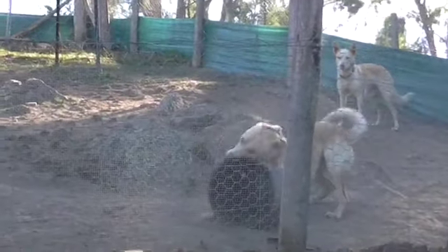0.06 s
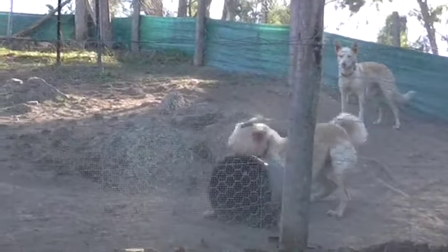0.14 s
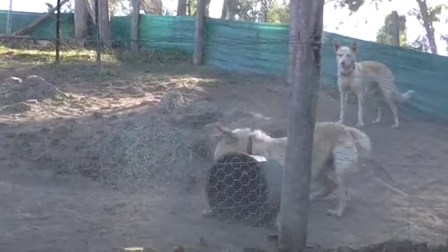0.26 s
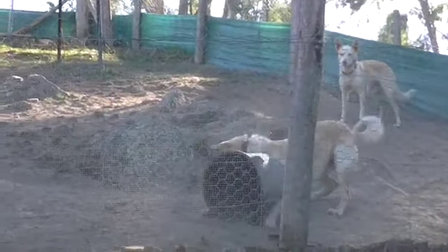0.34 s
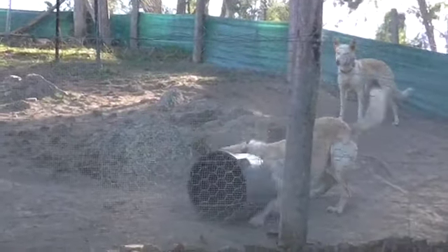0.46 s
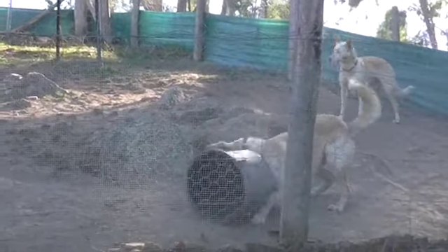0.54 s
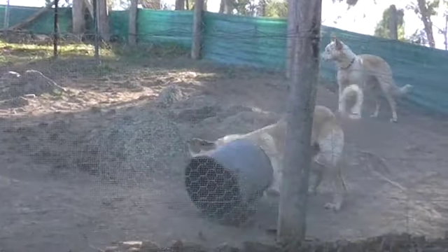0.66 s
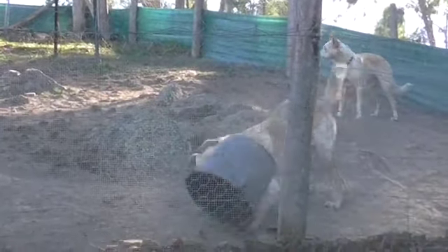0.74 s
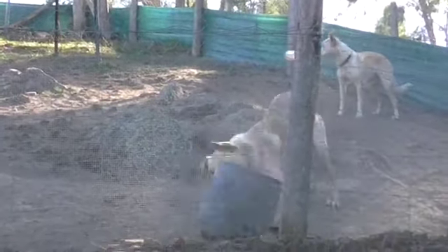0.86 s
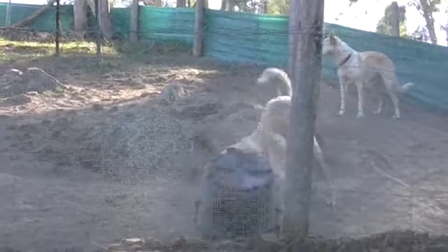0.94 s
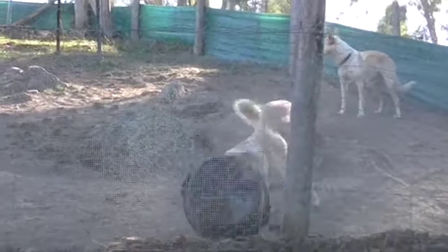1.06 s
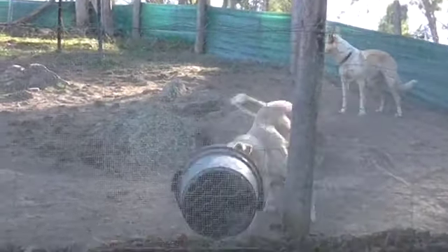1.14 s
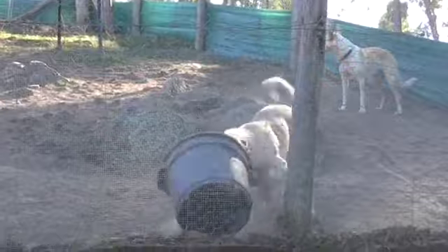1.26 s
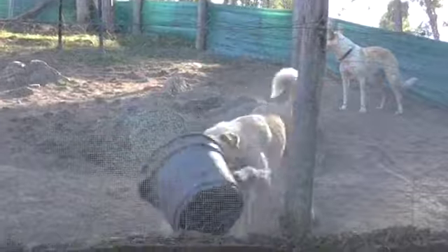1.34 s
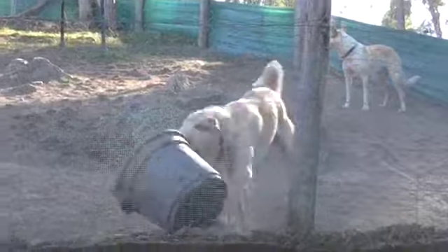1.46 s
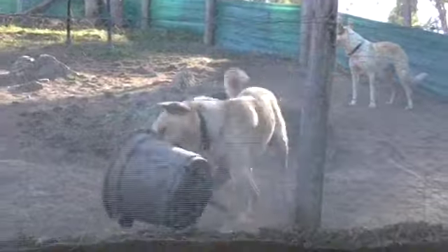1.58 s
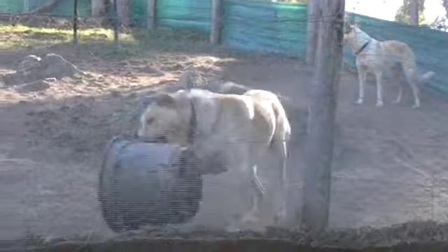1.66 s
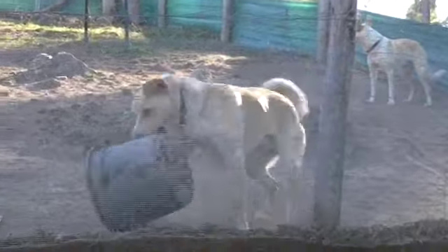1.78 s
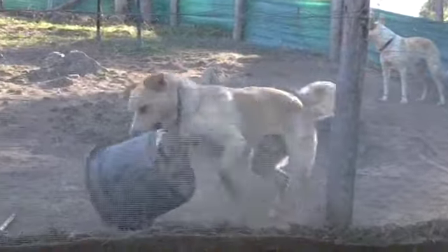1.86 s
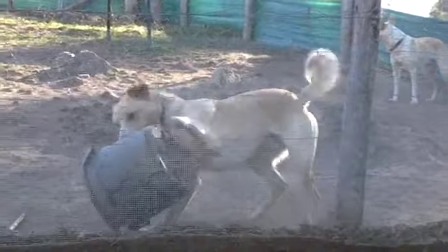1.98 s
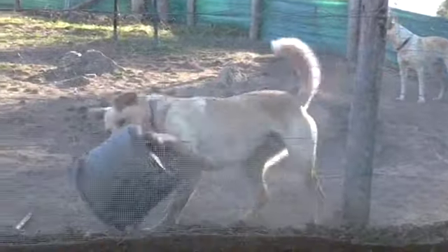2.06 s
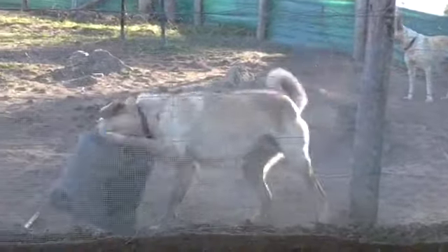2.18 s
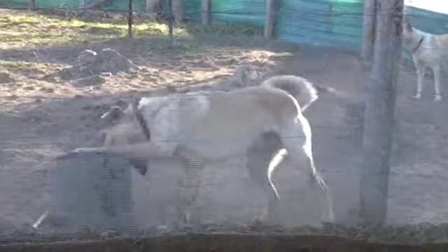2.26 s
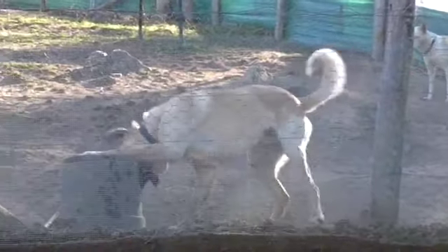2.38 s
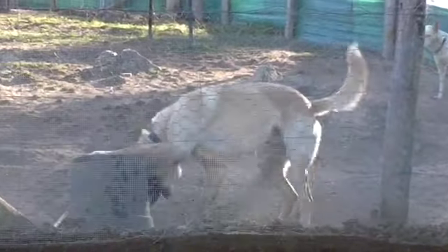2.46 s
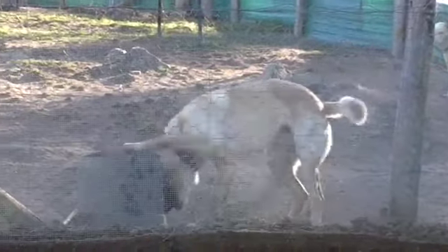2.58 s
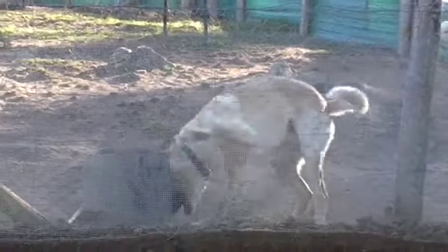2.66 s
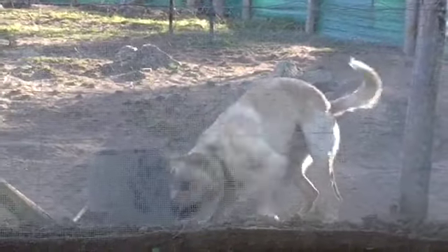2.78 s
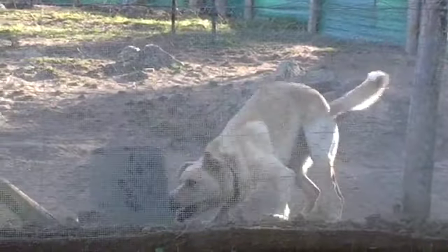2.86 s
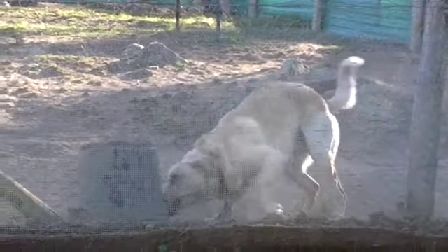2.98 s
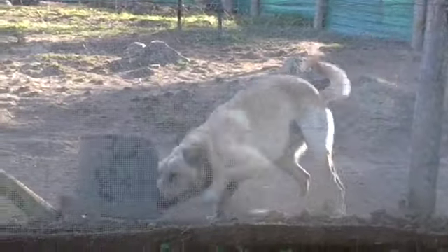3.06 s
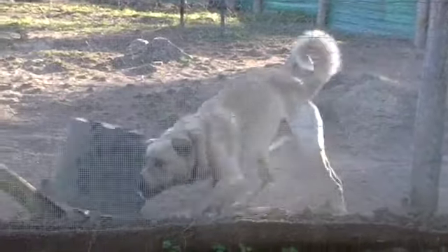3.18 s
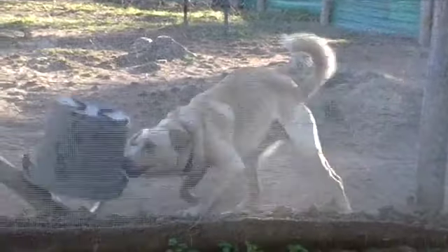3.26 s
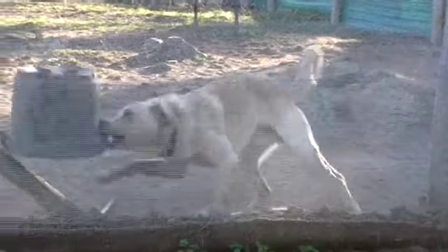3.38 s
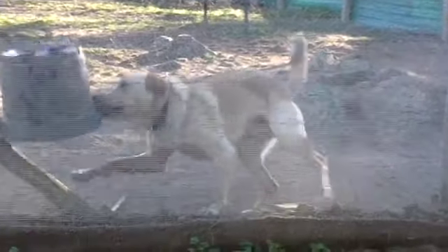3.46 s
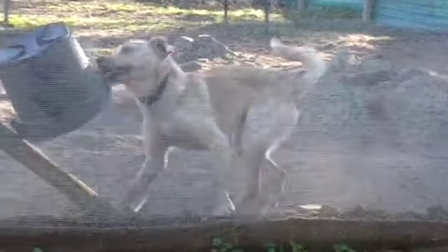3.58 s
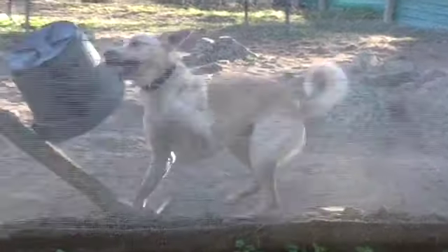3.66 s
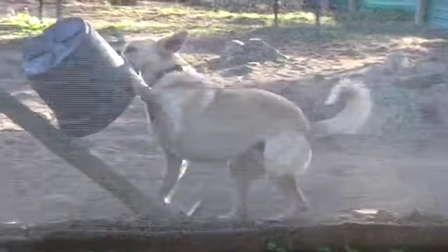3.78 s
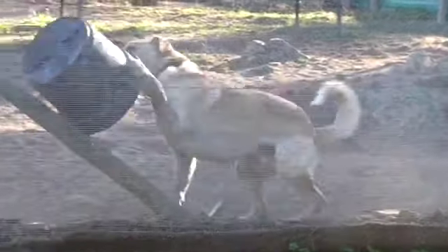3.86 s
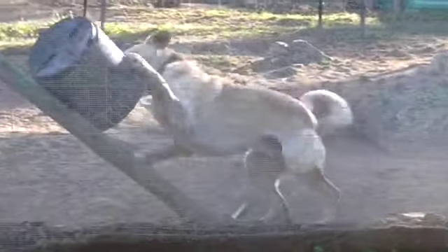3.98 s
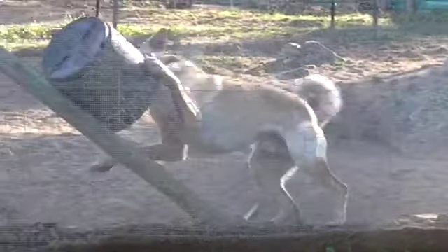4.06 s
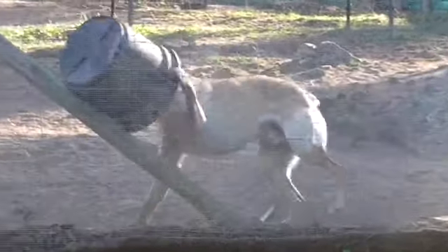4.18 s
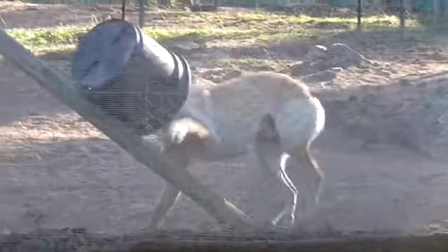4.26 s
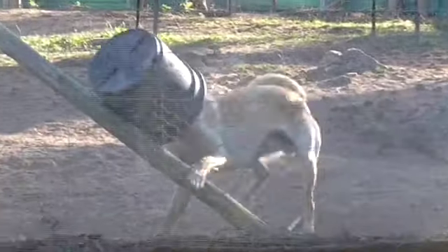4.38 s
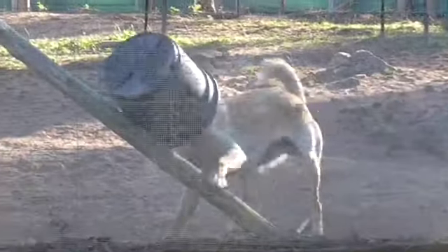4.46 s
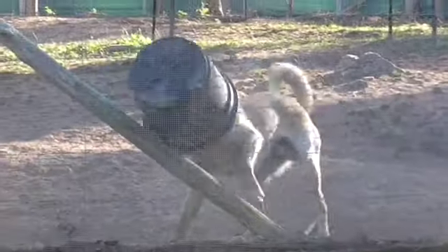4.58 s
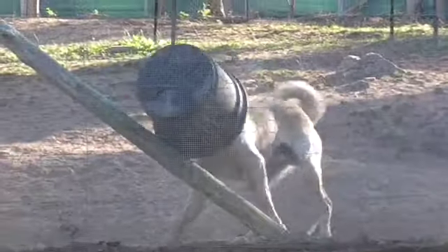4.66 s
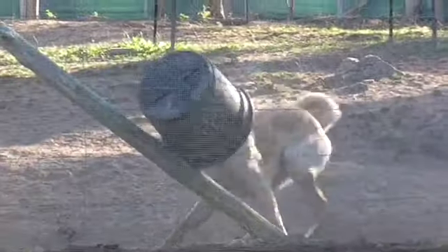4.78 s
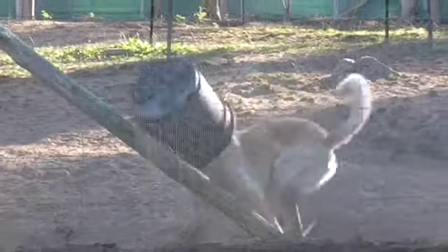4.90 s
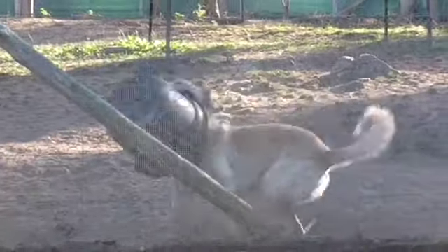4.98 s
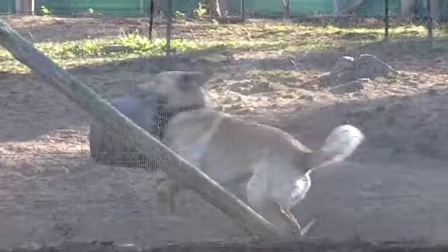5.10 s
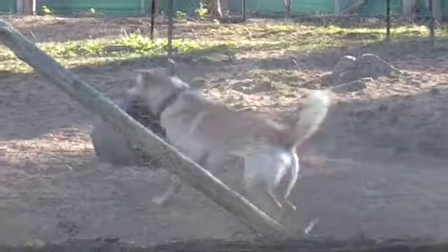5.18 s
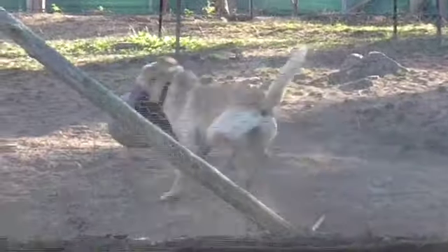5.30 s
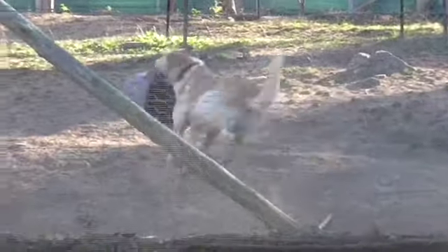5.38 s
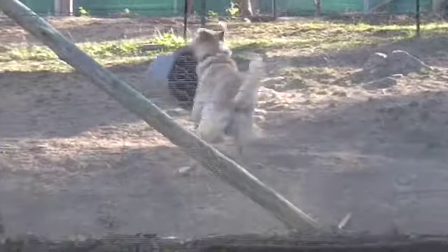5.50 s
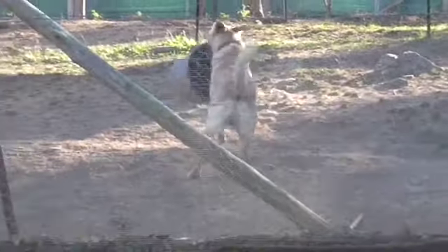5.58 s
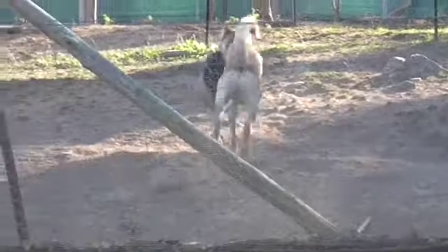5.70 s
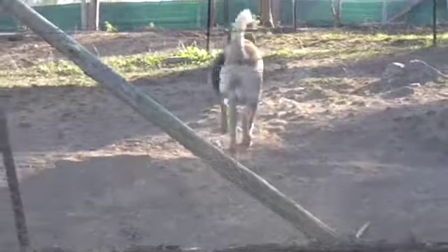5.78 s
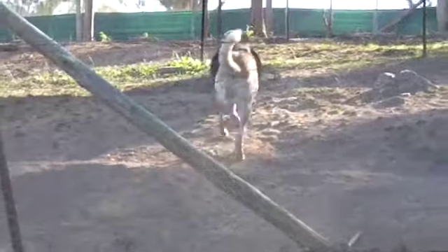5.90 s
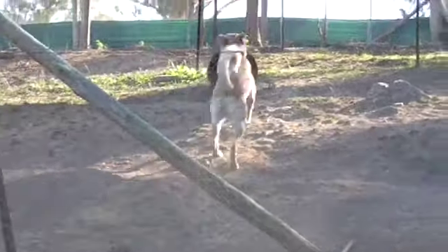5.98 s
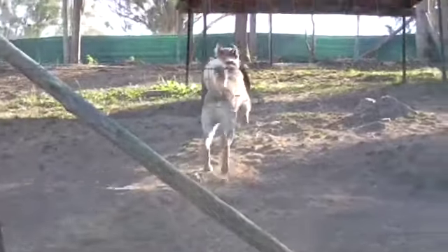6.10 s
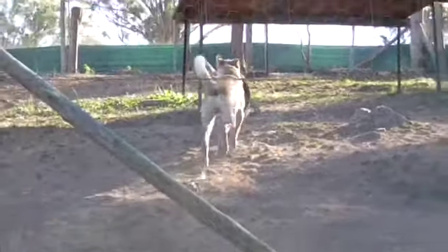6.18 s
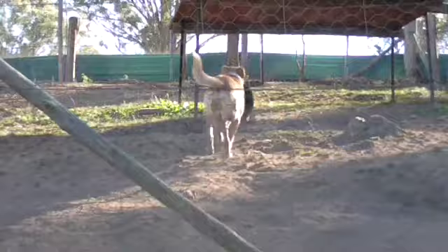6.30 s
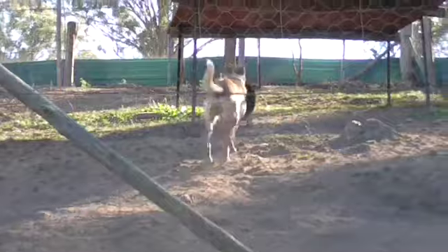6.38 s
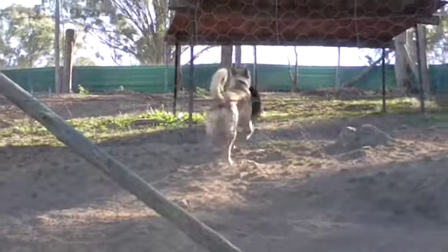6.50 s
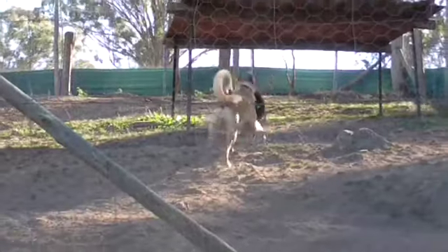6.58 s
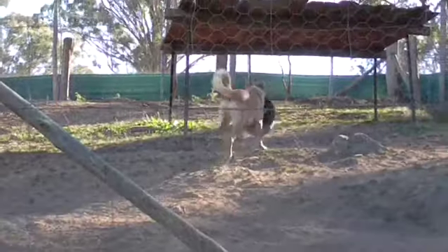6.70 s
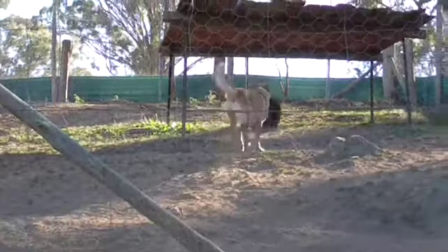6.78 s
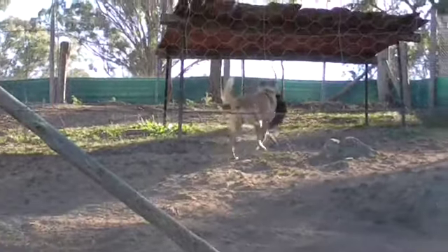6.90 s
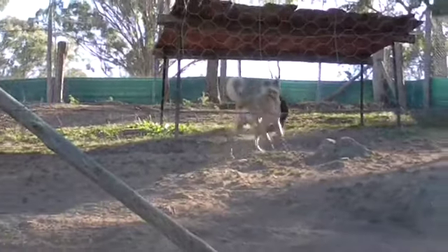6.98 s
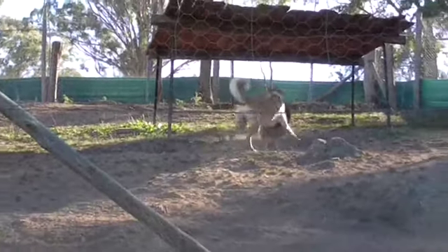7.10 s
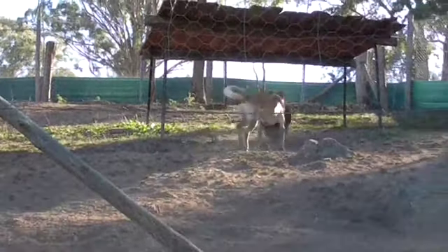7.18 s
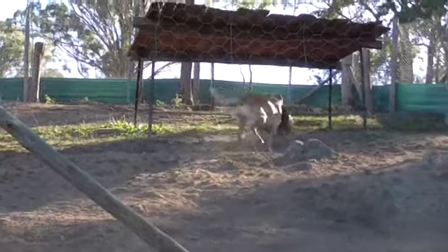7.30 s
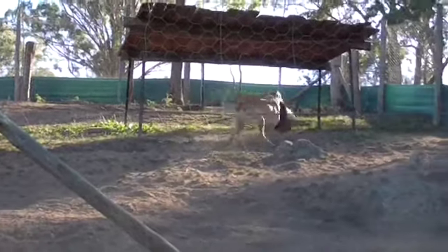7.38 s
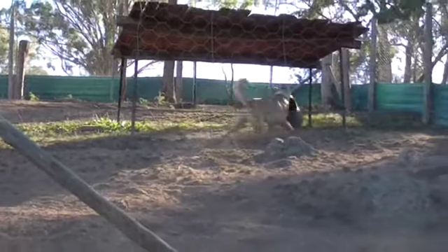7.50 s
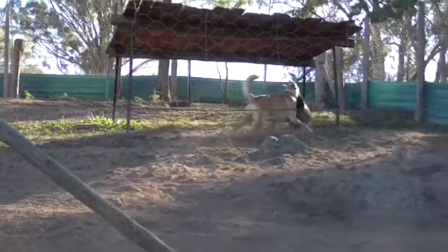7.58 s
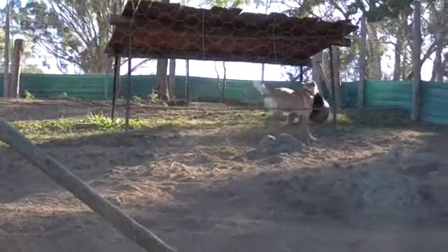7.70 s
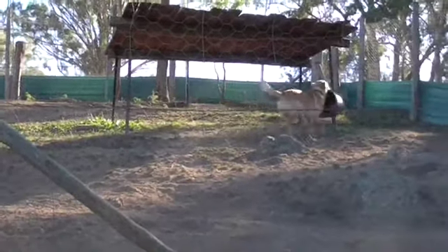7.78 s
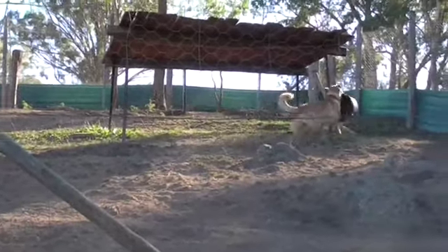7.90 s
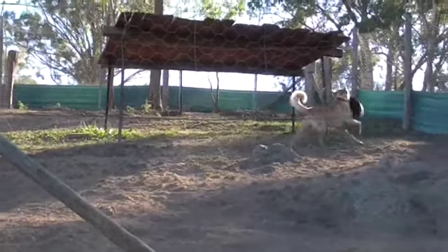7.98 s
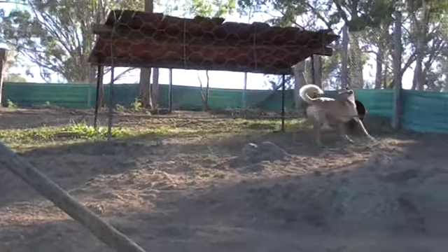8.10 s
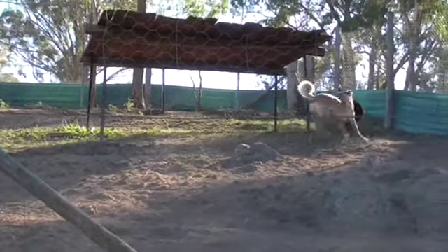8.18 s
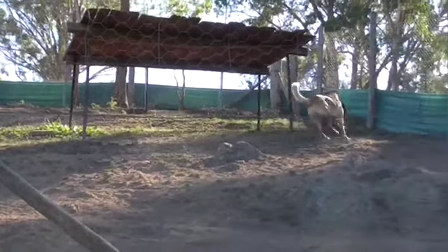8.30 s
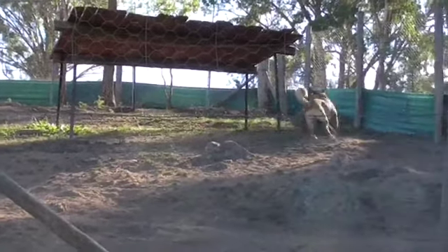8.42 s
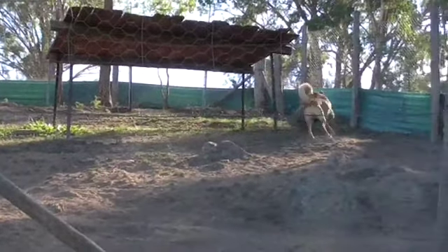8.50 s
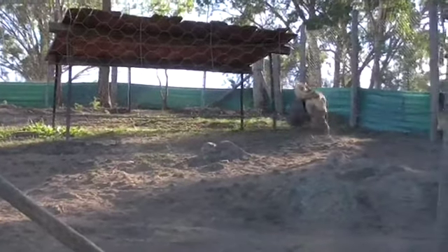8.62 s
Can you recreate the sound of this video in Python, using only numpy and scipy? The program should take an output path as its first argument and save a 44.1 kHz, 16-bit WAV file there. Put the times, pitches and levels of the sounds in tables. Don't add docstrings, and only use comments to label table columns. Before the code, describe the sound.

A dog knocks and drags a large hollow plastic pot over gritty soil in bursts, while parrots whistle and screech in trees to the right.

```python
import sys
import numpy as np
from scipy import signal
from scipy.io import wavfile
from scipy.ndimage import uniform_filter1d

SR = 44100
rng = np.random.default_rng(int(sys.argv[2]) if len(sys.argv) > 2 else 0)


def how_loud(loudness_db):
    steps = np.asarray(loudness_db, float) / 20
    return 10 ** steps


def master_out(mix):
    frames = np.transpose(np.atleast_2d(mix))
    ceiling = np.clip(frames, -1, 1)
    pcm = np.round(ceiling * 32767).astype(np.int16)
    wavfile.write(sys.argv[1], SR, pcm)


N = 381465


def band(x, hz, width):
    return signal.lfilter(*signal.iirpeak(hz, hz / width, fs=SR), x)


def between(x, lo_hz, hi_hz):
    return signal.sosfilt(signal.butter(3, [lo_hz, min(hi_hz, 20000)], "band", fs=SR, output="sos"), x)


def unit(x):
    return x / np.sqrt(np.mean(x ** 2))


def loudest_one(x):
    return x / np.abs(x).max()


def clock(seconds):
    return np.arange(int(seconds * SR)) / SR


def walk(rate, count=N):
    k = int(SR / rate)
    steps = np.repeat(rng.standard_normal(count // k + 1), k)
    return 1.376 * uniform_filter1d(uniform_filter1d(steps, k), k)[:count]


def add(out, s, piece):
    i = max(int(s * SR), 0)
    out[i:i + len(piece)] += piece[:len(out) - i]


def peak(top_db, start_s, end_s, rise, fall):
    t = np.arange(N) / SR
    return top_db - np.maximum(rise * np.maximum(start_s - t, 0), fall * np.maximum(t - end_s, 0))


# frequency in Hz, level in dB per Hz.
YARD_AIR = [(24, -53), (40, -2), (154, -11), (235, 4.5), (359, -28), (472, 7.5), (591, -38), (704, -6),
            (859, -3), (2710, -16), (4030, -11), (11500, -28.5), (15500, -53)]
# hum in Hz, width in Hz, level in dB.
MACHINE_HUM = [(237.7, 10, -70), (479.7, 34, -64), (708, 22, -71.5)]


def yard():
    air = 0
    air_hz, air_db = np.transpose(YARD_AIR)
    for hz in 45 * 2 ** np.arange(0, 8.6, .5):
        mid, side = (band(band(rng.standard_normal(N), hz, hz / 2), hz, hz / 2) for _ in range(2))
        flicker_db = 1.6 * walk(5) + min(hz / 2500, 2.5) * walk(14)
        db = np.interp(np.log(hz), np.log(air_hz), air_db) + flicker_db
        spread = min(hz / 67.0, 1.1 + hz / 30000)
        air = air + how_loud(db) * (mid + spread * side * np.array([[1], [-1]]))
    drone = sum(how_loud(db) * unit(band(rng.standard_normal(N), hz, w)) for hz, w, db in MACHINE_HUM)
    return how_loud(-56) * unit(air) + drone


# start in seconds, length in seconds, level in dB.
OUTBURSTS = [(0.0, 0.3, -40.5), (0.298, 0.5, -48), (0.482, 0.057, -41), (0.81, 0.059, -39.5),
             (1.036, 0.056, -44.5), (1.578, 0.35, -46.5), (1.933, 0.56, -46), (2.753, 0.31, -43),
             (2.988, 0.2, -50), (3.47, 0.14, -43), (3.77, 0.14, -45.5), (4.384, 0.043, -47.5),
             (4.777, 0.62, -48.5), (5.617, 0.21, -48), (5.905, 0.12, -49.5), (6.223, 0.094, -51),
             (6.42, 0.12, -44.5), (6.731, 0.21, -44), (7.32, 0.099, -45), (7.795, 0.15, -45.5),
             (7.97, 0.18, -44), (8.443, 0.012, -43.5)]


def uproar():
    lull_db, rise_db_per_s, fall_db_per_s = -56.0, 223, 107
    db = np.full(N, lull_db)
    for s, length, top_db in OUTBURSTS:
        db = np.maximum(db, peak(top_db, s, s + length, rise_db_per_s, fall_db_per_s))
    return db


# frequency in Hz, width in Hz, level in dB.
THROATS = [(3500, 280, 0), (4700, 1230, 3.5), (6000, 460, -15), (9000, 2700, -36), (1900, 1200, 0.5)]


def flock():
    db = uproar()
    rasp = sum(how_loud(d + 1.85 * walk(22)) * unit(band(rng.standard_normal(N), f, w)) for f, w, d in THROATS)
    chirps = np.zeros(N)
    for when, pitch, bend, span, size in rng.random((450, 5)):
        t = clock(0.02 + 0.076 * span)
        glide = 1 + 4 * (bend - .4) * t + .02 * walk(40, count=len(t))
        hz = 2800 * 2.3 ** pitch ** 1.3 * glide
        husk = .5 + walk(300, count=len(t))
        tone = np.sin(2 * np.pi * np.cumsum(hz) / SR)
        add(chirps, when * N / SR, how_loud(-7.0 * size) * np.hanning(len(t)) * husk * tone)
    return how_loud(db - 6.5) * unit(unit(rasp) + 0.64 * unit(chirps))


# start in seconds, length in seconds, pitch in Hz, level in dB.
TWO_NOTE_CALLS = [(0.558, 0.1, 4047, -46), (1.114, 0.23, 4160, -56.5), (2.046, 0.083, 4000, -51.5),
                  (2.865, 0.186, 4070, -56), (3.736, 0.17, 3865, -59.5)]
# start in seconds, length in seconds, first Hz, last Hz, level in dB.
PLAIN_GLIDES = [(0.468, 0.035, 3800, 5200, -50.5), (.495, .035, 5250, 5270, -50),
                (0.535, 0.045, 5730, 5150, -48.5), (0.79, .045, 4300, 5900, -47),
                (1.541, 0.36, 3936, 3680, -61.5), (2.002, 0.056, 4816, 5450, -55.5),
                (2.675, 0.03, 3400, 4800, -55), (2.695, 0.03, 2900, 4200, -55.5),
                (2.757, 0.038, 4450, 4580, -53.5), (2.8, .1, 5400, 5450, -57), (3.09, .2, 5900, 5900, -59),
                (1.82, .17, 5400, 5500, -61), (.83, .07, 6200, 6250, -47), (.3, .11, 2850, 2900, -58),
                (7.41, .1, 2520, 1850, -55), (6.92, .1, 3200, 2750, -55), (7.78, .08, 3300, 3200, -58),
                (7.39, .07, 3550, 4000, -58), (0.11, 0.04, 5700, 6200, -43), (.08, .04, 6450, 6500, -46),
                (.17, .03, 6600, 6650, -45), (.2, .05, 3600, 3650, -43), (.25, .3, 5250, 5280, -63),
                (4.674, 0.17, 2860, 4090, -59), (5.933, 0.17, 5000, 5410, -59),
                (5.55, 0.05, 3750, 3700, -54.5), (5.3, .07, 3750, 3300, -53),
                (6.385, .045, 4500, 5450, -54), (5.878, .035, 2900, 4000, -57),
                (6.76, .15, 3560, 3300, -54), (6.915, 0.12, 3800, 4250, -59), (7.095, .16, 4350, 4300, -61),
                (7.19, 0.12, 3450, 3100, -53), (8.078, .05, 1900, 4700, -54), (8.01, 0.09, 5050, 5100, -57)]
# start in seconds, length in seconds, first Hz, last Hz, level in dB.
REEDY_GLIDES = [(1.825, 0.2, 2980, 2920, -61), (2.81, 0.086, 2680, 2940, -57),
                (4.26, 0.15, 2325, 2700, -62.5), (4.979, 0.2, 1745, 1790, -59.5),
                (5.52, 0.092, 875, 913, -66), (5.579, 0.19, 920, 1690, -62.5),
                (3.096, 0.063, 2954, 2940, -59), (6.034, .17, 2960, 3120, -59),
                (6.756, 0.081, 898, 950, -57), (7.108, 0.2, 2933, 3020, -57.5),
                (8.451, 0.047, 1640, 1705, -58.5)]
# start in seconds, length in seconds, pitch in Hz, level in dB.
HELD_NOTES = [(0.09, 0.038, 4210, -46), (0.147, 0.024, 4410, -34), (.815, 0.041, 4200, -47),
              (.852, 0.038, 4260, -42.5), (5.884, 0.28, 1717, -66.5), (2.435, 0.21, 4010, -63),
              (2.776, 0.031, 3970, -46.5), (3.15, 0.075, 3650, -55), (4.851, 0.52, 3655, -61),
              (4.902, 0.34, 4380, -63), (5.205, 0.085, 4460, -48.5), (5.22, .07, 4250, -54),
              (5.2, 0.11, 3590, -56), (5.34, 0.14, 3303, -58), (5.29, 0.087, 4370, -56),
              (5.598, 0.038, 3400, -58), (6.14, 0.067, 3230, -52.5), (2.715, 0.04, 4199, -55),
              (2.872, 0.038, 4200, -49.5), (7.268, .16, 2450, -57), (8.11, 0.045, 4230, -54),
              (6.385, 0.046, 1264, -59), (7.75, 0.05, 2160, -60), (7.87, 0.061, 2205, -61),
              (5.745, 0.041, 3550, -50), (5.909, 0.22, 3553, -55), (6.029, 0.063, 4310, -58),
              (6.459, 0.088, 3800, -56), (6.748, 0.14, 3580, -59), (7.57, 0.041, 3535, -51),
              (7.741, 0.035, 4200, -59), (7.898, 0.066, 3630, -54), (8.439, 0.044, 3870, -49),
              (8.464, 0.051, 3300, -56)]
# start in seconds, first Hz, last Hz, level in dB.
UPWARD_FLICKS = [(.05, 3720, 4030, -45), (.513, 5900, 6500, -52), (.806, 3960, 4260, -48),
                 (2.775, 4530, 5630, -63), (5.515, 2500, 3080, -59), (5.537, 2600, 3100, -63),
                 (5.555, 3300, 3800, -58), (5.595, 2750, 3320, -65), (5.715, 3080, 4697, -55),
                 (5.748, 2900, 3470, -69), (5.905, 2800, 3650, -56), (5.945, 3500, 4170, -53),
                 (6.025, 2400, 2900, -61), (6.72, 3500, 4400, -58), (6.77, 3500, 4260, -53),
                 (6.81, 3700, 4660, -50), (6.83, 3420, 4170, -60), (7.06, 3780, 4030, -53),
                 (7.185, 3840, 4100, -55), (7.475, 3650, 4370, -56.5), (7.49, 4100, 4730, -53.5),
                 (7.755, 4200, 5300, -62), (7.77, 3900, 4280, -57), (8.179, 2880, 3130, -63),
                 (8.495, 3050, 3450, -53), (7.744, 3900, 4730, -53.5)]


def notes():
    plain_db, reedy_db = -17.5, 0
    flick_s = 0.0342
    answer_s, answer_ratio, answer_sag, answer_db = 0.068, .8, 0.97, -4.5
    rows = [(*g, plain_db) for g in PLAIN_GLIDES]
    rows += [(*g, reedy_db) for g in REEDY_GLIDES]
    rows += [(s, flick_s, hz0, hz1, db, plain_db) for s, hz0, hz1, db in UPWARD_FLICKS]
    rows += [(s, length, hz, hz, db, plain_db) for s, length, hz, db in HELD_NOTES]
    for s, length, hz, db in TWO_NOTE_CALLS:
        low = hz * answer_ratio
        rows.append((s, length, hz, hz, db, plain_db))
        rows.append((s + answer_s, length, low, low * answer_sag, db + answer_db, reedy_db))
    return rows


def whistles():
    out = np.zeros(N)
    for s, length, hz0, hz1, db, octave_db in notes():
        t = clock(length)
        scoop = 1 - 0.0481 * np.exp(-t / 0.0126) + 0.01398 * walk(60.04, count=len(t))
        hz = (hz0 + (hz1 - hz0) * t / length) * scoop
        phase = 2 * np.pi * np.cumsum(hz) / SR
        husk, rasp, hiss = (walk(rate, count=len(t)) for rate in (200, 900, 2200))
        upper = (0.8 + 0.44 * rasp) * np.sin(2 * phase)
        upper = upper + hiss * (how_loud(-13.0) * np.sin(3 * phase) + how_loud(-25) * np.sin(4 * phase))
        tone = (1.15 + 0.46 * husk + 0.5 * rasp) * np.sin(phase) + how_loud(octave_db) * upper
        flutter = walk(41.3, count=len(t))
        shape = np.clip(np.minimum(t / 0.0048, (length - t) / 0.013), 0, 1)
        shape = shape * how_loud(2.9 * (flutter - flutter.mean()))
        add(out, s, np.sqrt(2) * how_loud(db) * shape * tone)
    return out


# start in seconds, length in seconds, first Hz, last Hz, level in dB.
HARSH_CALLS = [
    (0.069, .19, 3090, 3660, -46.5),
    (0.811, .23, 3190, 3570, -49),
]


def screeches():
    split_hz, split_depth, partials_db = 360, 0.62, (6.5, 4, -6.5, -16)
    out = np.zeros(N)
    for s, length, hz0, hz1, db in HARSH_CALLS:
        t = clock(length)
        hz = (hz0 + (hz1 - hz0) * (t / length) ** 0.86) * (1 + 0.018 * walk(70.2, count=len(t)))
        split = np.cumsum(split_hz * (1 + 0.433 * walk(70, count=len(t)))) * 2 * np.pi / SR
        phase = 2 * np.pi * np.cumsum(hz) / SR + 0.5 * split_depth * np.sin(split)
        tone = 0
        for k, partial_db in enumerate(partials_db, 1):
            tear = 0.92 + 0.36 * walk(300 * k, count=len(t))
            tone = tone + how_loud(partial_db) * tear * np.sin(k * phase)
        shape = np.clip(np.minimum(t / 0.018, (length - t) / 0.076), 0, 1)
        add(out, s, np.sqrt(2) * how_loud(db + 1.7 * walk(60.0, count=len(t))) * shape * tone)
    return out


# time in seconds, peak in dB.
PAW_FALLS = [(4.219, -45), (5.458, -58), (5.635, -49.5), (5.759, -68), (5.868, -50), (8.362, -60)]


def paws():
    thud_hz, thud_s = 94, 0.021
    out, t = np.zeros(N), clock(.2)
    for s, db in PAW_FALLS:
        thud = band(rng.standard_normal(len(t)) * t * np.exp(-t / thud_s), thud_hz, 100)
        add(out, s - .01, how_loud(db + 6.5) * loudest_one(thud))
    return out


# time in seconds, hollow note peak in dB, note in Hz,
# wall clatter in dB above the note, ring t60 in seconds.
FIRM_BLOWS = [(0.037, -33, 215, -3.5, 0.32), (0.111, -24.5, 210, -26, 0.11),
              (0.173, -22, 231.8, -12.5, 0.1), (0.762, -31.5, 216.5, -35, 0.15),
              (0.885, -31.5, 279, -5.5, 0.1), (1.087, -16, 215, -10.5, .17), (1.172, -22, 221.6, -7, 0.16),
              (1.349, -13.5, 215, -23, 0.12), (1.485, -26.5, 204, -14.5, 0.096),
              (1.606, -13.5, 215.6, -46, 0.16), (1.732, -36.5, 285, -6, 0.23),
              (2.248, -22.5, 275.6, -9, 0.15), (2.306, -22, 271, -30, 0.08), (2.365, -26.5, 290, -30, 0.12),
              (2.476, -8.5, 174.6, -17, 0.12), (2.952, -26, 162.3, -19, 0.18), (3.002, -21, 172, -22, 0.13),
              (3.048, -26, 179, -11, 0.21), (3.172, -26, 190, -16.5, 0.16), (3.142, -30.5, 205, -10, 0.22),
              (3.279, -26, 215, -8.5, 0.19), (3.95, -21, 218, -39, 0.24), (4.117, -11.5, 192, -19.5, 0.078),
              (4.65, -17.5, 211, -25, 0.077), (4.749, -32.5, 230, -27, 0.12),
              (4.807, -22.5, 223.4, -30, 0.11), (4.863, -29, 198, -7, 0.1), (5.326, -28, 184, -9.5, 0.2)]
# time in seconds, hollow note peak in dB.
LIGHT_NUDGES = [(0.244, -34.5), (0.369, -32.5), (0.585, -35), (0.724, -43.5), (0.834, -34), (1.935, -40),
                (2.151, -36.5), (2.782, -36.5), (1.592, -36), (3.232, -27), (3.344, -33.5), (3.366, -33),
                (3.386, -31), (3.41, -28), (3.428, -30), (3.5, -29), (3.519, -31.5), (3.621, -32),
                (3.667, -34), (3.69, -36.5), (4.267, -47), (4.632, -32.5), (4.775, -35), (4.99, -34.5),
                (4.2, -36), (4.533, -39), (4.951, -36.5), (5.077, -35), (5.376, -34.5), (5.675, -51),
                (5.852, -38.5), (6.33, -46), (6.755, -46), (7.749, -49), (8.209, -49)]


def struck():
    nudge_hz, nudge_wall_db, nudge_t60_s = 218.6, -8, 0.12
    return FIRM_BLOWS + [(s, db, nudge_hz, nudge_wall_db, nudge_t60_s) for s, db in LIGHT_NUDGES]


# start, hardest moment and end in seconds, wall scrape in dB, sand in dB above it.
SOIL_STROKES = [(-.1, 0.064, 0.25, -34, -3.5), (0.742, 0.868, 1.05, -44.5, -2),
                (1.468, 1.482, 1.58, -33.5, -8.5), (1.51, 1.625, 2.15, -46, -1),
                (1.695, 1.758, 2.09, -40.5, -20), (2.064, 2.082, 2.2, -46, -29),
                (2.2, 2.282, 2.45, -36, -8.5), (2.678, 2.76, 2.9, -47, -10), (3.1, 3.283, 3.5, -39.5, -17),
                (3.255, 3.556, 3.72, -25.5, -12.5), (4.097, 4.16, 4.26, -39, -9.5),
                (4.337, 4.431, 4.655, -46, -8), (4.703, 4.814, 4.86, -48, 0),
                (4.844, 4.877, 4.95, -33.5, -14.5), (4.874, 4.973, 5.27, -45.5, -12),
                (1.628, 1.656, 1.72, -41.5, 7.5), (4.843, 5.07, 5.12, -41.5, -14),
                (5.298, 5.365, 5.58, -53, 3), (5.552, 5.714, 6.0, -53.5, 5)]


def effort():
    pawing_ends_s, pawing_fade_s = 5.94, 0.36
    swell_db, rumble_db, rumble_share = 22, -19.5, 0.6
    skid_db, skid_share, skid_wall_db, skid_sand_db, skid_db_per_s = -25.5, 0.54, -19.5, -32, 141
    hollow, wall, sand = (np.full(N, idle_db) for idle_db in (-55.0, -56.0, -62.0))
    for start, top, end, db, sand_db in SOIL_STROKES:
        push = peak(db, top, top, swell_db / (top - start), swell_db / (end - top))
        wall, sand = np.maximum(wall, push), np.maximum(sand, push + sand_db)
        hollow = np.maximum(hollow, np.minimum(rumble_db + rumble_share * push, push + 12))
    for s, db, _, wall_db, _ in struck():
        skid = peak(0, s + 0.0049, s + 0.0069, 2200, skid_db_per_s)
        shudder = skid + skid_db + skid_share * db
        hollow = np.maximum(hollow, shudder)
        wall = np.maximum(wall, skid + skid_wall_db + db + wall_db)
        sand = np.maximum(sand, shudder + skid_sand_db)
    gate = np.clip((pawing_ends_s - np.arange(N) / SR) / pawing_fade_s, 0, 1)
    return (hollow, wall, sand), gate


def grit(rate, spread_db):
    caught = rng.random(N) < rate / SR
    return unit(caught * rng.standard_normal(N) * how_loud(spread_db * rng.exponential(size=N)))


# frequency in Hz, width in Hz, level in dB.
AIR_MODES = [(215, 17, -3.5), (266, 22, -14.5), (168.3, 13.5, -11)]
# frequency in Hz, width in Hz, level in dB.
WALL_MODES = [(520, 49, 3.5), (648.5, 35, 2.5), (780, 29.4, 3.5), (933, 69, 1), (1163, 115, 5.5),
              (1390, 78, 2), (1508, 59, 3), (1770, 150, 1), (2125, 380, -6.5), (2600, 510, -40)]


def drag():
    (hollow_db, wall_db, grit_db), gate = effort()
    bumps = grit(230, 0.83)
    stones = grit(1300, 1.3) * how_loud(2 * walk(25.16))
    bright = np.maximum(wall_db + 37, 0) * 0.2
    rumble = unit(sum(how_loud(db) * band(bumps, f, w) for f, w, db in AIR_MODES))
    scrape = 0
    for k, (f, w, db) in enumerate(WALL_MODES):
        mode_db = db + 3.3 * walk(9) + bright * np.log2(f / 900)
        scrape = scrape + (-1) ** k * how_loud(mode_db) * band(stones, f, w)
    grains = grit(4500, 0.96) * how_loud(2 * walk(29.68))
    sand = unit(between(grains, 7000, 13000)) + how_loud(3.0) * unit(between(grains, 2200, 7000))
    body = how_loud(hollow_db + 0.5) * rumble + how_loud(wall_db) * unit(scrape)
    return gate * body, gate * how_loud(grit_db) * sand


# time in seconds, peak in dB, wall mode woken in Hz.
STONE_KNOCKS = [(0.031, -13.5, 583), (0.241, -18, 645), (0.572, -31, 547), (0.676, -23.5, 746),
                (0.725, -30, 800), (0.854, -33, 1530), (1.087, -25, 1470), (1.097, -16, 510),
                (1.14, -28, 1459), (1.169, -14.5, 515), (1.194, -16, 520), (1.342, -15.5, 1077),
                (1.483, -29, 1190), (1.498, -23, 1190), (1.565, -28.5, 2170), (1.645, -18, 1530),
                (1.696, -31, 1390), (1.733, -28, 1270), (1.945, -35, 610), (2.086, -32, 1380),
                (2.139, -25, 1130), (2.366, -28, 616), (2.472, -12, 727.8), (2.48, -21, 493),
                (2.791, -31, 509.8), (3.047, -43, 780), (3.225, -25, 485), (3.27, -25, 740),
                (3.295, -26, 734), (3.32, -37, 1230), (3.346, -24, 598), (3.376, -26, 1100),
                (3.429, -26, 810), (3.46, -25, 1270), (3.489, -13, 1220), (3.548, -19, 1780),
                (3.57, -10.5, 800), (3.585, -12.5, 720), (3.663, -19, 830), (3.434, -25, 2050),
                (3.61, -35, 2200), (4.196, -25, 307), (4.152, -17.5, 275), (3.47, -30, 524),
                (3.531, -22, 1770), (2.779, -33, 305), (3.95, -5, 1190), (4.113, -13.5, 1090),
                (4.153, -23.5, 1490), (4.435, -25, 1160), (4.449, -25.5, 1090), (4.489, -29.5, 990),
                (4.646, -20, 1070), (4.744, -27, 1240), (4.762, -36, 1172), (4.799, -18, 1180),
                (4.815, -18, 1140), (4.863, -17.5, 994.6), (4.93, -33, 1230), (5.019, -25, 1450),
                (5.074, -35, 643)]


def knocks():
    out, t = np.zeros(N), clock(.08)
    for s, db, hz in STONE_KNOCKS:
        touch = rng.standard_normal(len(t)) * np.exp(-t / 0.005)
        touch = between(touch, hz / 2, hz * 2)
        neighbours = sum(band(touch, hz * r, hz / 19.0) for r in (.66, 1.45))
        knock = band(touch, hz, hz / 8) + how_loud(-12.5) * neighbours
        add(out, s - .001, how_loud(db - 6) * loudest_one(knock))
    return out


def ring(t, modes, spread_db):
    luck = rng.standard_normal((len(modes), 2))
    y = 0
    for (f, w, db), (a, b) in zip(modes, luck):
        y = y + how_loud(db + spread_db * a) * np.exp(-np.pi * w * t) * np.sin(2 * np.pi * f * (1 + 0.053 * b) * t)
    return loudest_one(y)


# time in seconds, treble peak in dB, wall in dB above it,
# top treble in dB above it.
HARD_TICKS = [(0.0304, -42, -6, -19), (0.6771, -32, 15.5, -23), (1.0919, -36, 27, -18),
              (1.195, -33.5, 15, 2), (1.3437, -18, 1.5, -7), (1.481, -33, -21, -16), (1.566, -32, -3, -5),
              (1.6123, -31, 9.5, 5), (1.643, -24, -6, 7), (1.738, -28, -7, -6), (4.683, -46, 10, -20),
              (4.862, -38, -2, -12), (2.237, -24.5, -15, -2), (2.2476, -16.5, -23, -15),
              (2.4689, -21.5, -4, -24), (2.4812, -36, 16.5, -13), (3.226, -28, 10, -25),
              (3.5565, -13.5, -8, -20), (3.572, -29, 11, -15), (3.664, -25.5, 6, -25),
              (3.9496, -7.5, -0.5, -2.5), (3.9803, -28, 8, -14), (4.112, -39, 23, 7), (4.151, -23, 1, -3),
              (4.5114, -28, 5, -6), (4.578, -22, -9, -23), (4.6006, -27, -36, -24),
              (4.6283, -44, 17.5, -20), (4.743, -33.5, 8.5, -29), (4.814, -25.5, 10, -21),
              (5.345, -24, -8, 5), (5.382, -30, -11, 1)]


def ticks():
    out, t = np.zeros(N), clock(.1)
    for s, db, wall_db, top_db in HARD_TICKS:
        spit = rng.standard_normal(len(t)) * (np.exp(-t / 0.0013) + 0.12 * np.exp(-t / 0.033))
        spit = spit + 2.4 * (t == 0)
        mid, top = between(spit, 3100, 8000), between(spit, 8000, 16000)
        crack = loudest_one(mid) + how_loud(top_db) * loudest_one(top)
        knock = signal.fftconvolve(spit, ring(t, WALL_MODES[3:], 3))[:len(t)]
        add(out, s, how_loud(db - 7.0) * crack + how_loud(db + wall_db - 5.0) * loudest_one(knock))
    return out


def blows():
    out, t = np.zeros(N), clock(.4)
    for s, db, hz, wall_db, t60 in struck():
        fade = np.exp(-np.log(1000) * (t / t60) ** 1.196) + 0.049 * np.exp(-t / .045)
        off = hz - 217
        partner_hz = hz + (45 if off < 15 else -58)
        partner = np.clip(abs(off) / 35, .12, .75) * np.sin(2 * np.pi * partner_hz * t)
        note = (np.sin(2 * np.pi * hz * t) - partner) / np.abs(1 + partner).max() * 1.04
        thump_db = -26 - 0.3237 * max(off, 0) + 15.0 + 0.26 * (db + 15)
        thump = how_loud(thump_db) * np.sin(2 * np.pi * 146 * t) * np.exp(-t / 0.016)
        note = (note * fade + thump) * (1 - np.exp(-t / 0.0025))
        shake = rng.standard_normal(len(t)) * (np.exp(-t / 0.012) + 0.96 * np.exp(-t / 0.033))
        rattle = signal.fftconvolve(shake, ring(t[:3000], WALL_MODES, 3.3))[:len(t)]
        add(out, s - .003, how_loud(db + 5.5) * note + how_loud(db + wall_db + 7.0) * loudest_one(rattle))
    return out


def echoes(x, t60, wet_db, lo_hz, hi_hz):
    t = clock(.8)
    tail = rng.standard_normal((2, len(t))) * np.exp(-np.log(1000) * t / t60) * (t > .003)
    tail = signal.lfilter(*signal.butter(2, [lo_hz, hi_hz], "band", fs=SR), tail)
    tail = how_loud(wet_db) * tail / np.sqrt(np.sum(tail ** 2, axis=1, keepdims=True))
    return signal.fftconvolve(x[None], tail, axes=1)[:, :N]


def scene():
    body, sand = drag()
    birds = whistles() + screeches() + flock()
    pot = blows() + ticks() + knocks() + paws() + body + how_loud(-7.5) * sand
    near = echoes(pot, 0.13, -14, 362, 6000)
    near = near + echoes(pot, 0.012, -3.5, 5800, 15000) * how_loud(np.array([[-3.0], [3.0]]))
    near = near + echoes(pot, .06, -40, 25, 130)
    right = how_loud(np.array([[-2.5], [2.5]]))
    trees = right * (how_loud(-1.0) * birds + echoes(birds, 0.43, -3.5, 550, 18300))
    return pot + near + trees + yard()


def top_cut(x):
    return signal.sosfilt(signal.butter(12, 16510, fs=SR, output="sos"), x)


def record(dry):
    thin = signal.sosfilt(signal.butter(3, 80, "high", fs=SR, output="sos"), dry)
    thin = signal.sosfilt(signal.butter(10, 14900, fs=SR, output="sos"), thin)
    return top_cut(thin)


dry = scene()
out = record(dry)
master_out(out)
```